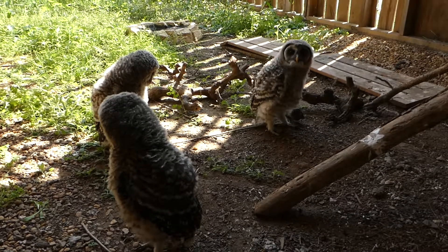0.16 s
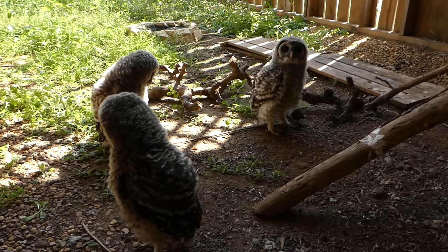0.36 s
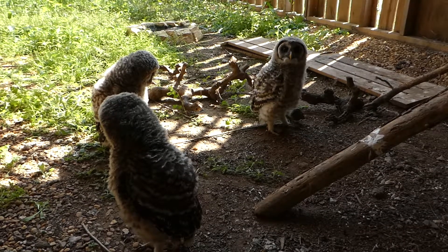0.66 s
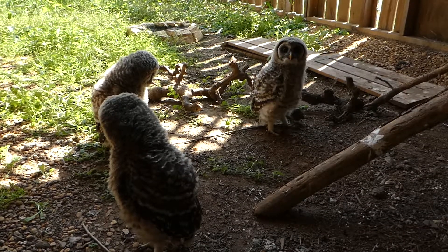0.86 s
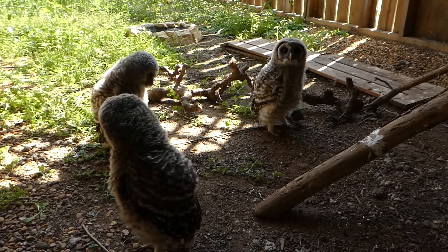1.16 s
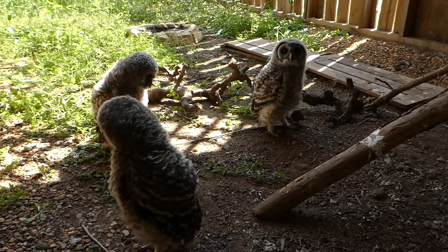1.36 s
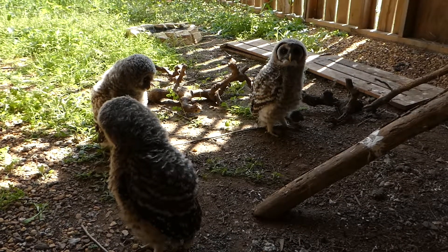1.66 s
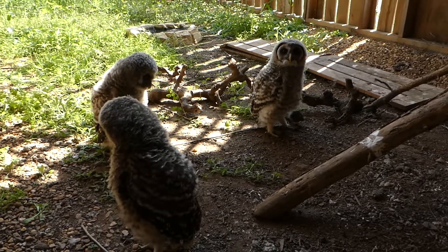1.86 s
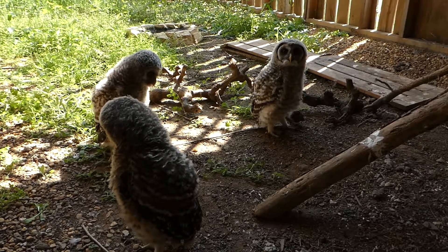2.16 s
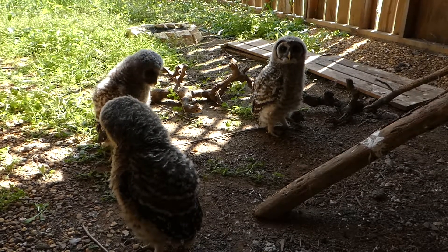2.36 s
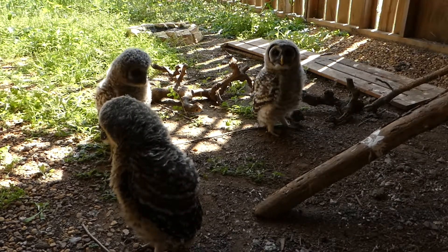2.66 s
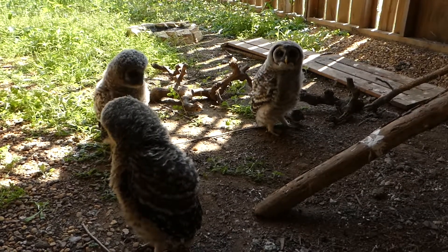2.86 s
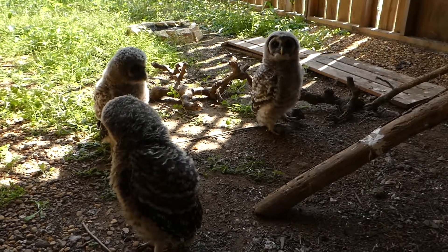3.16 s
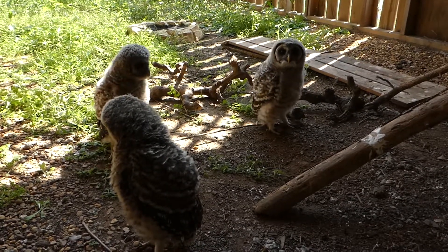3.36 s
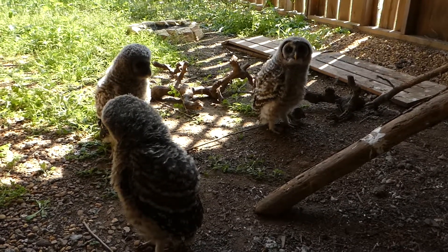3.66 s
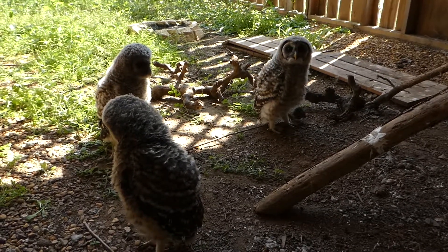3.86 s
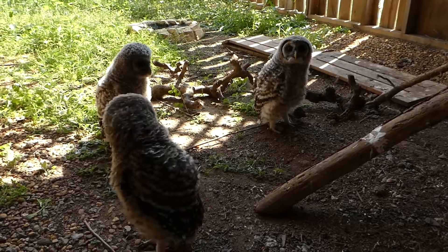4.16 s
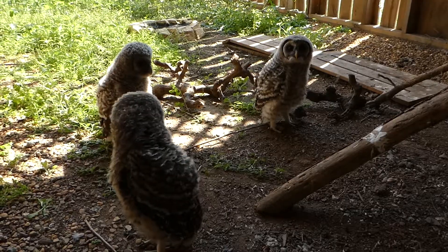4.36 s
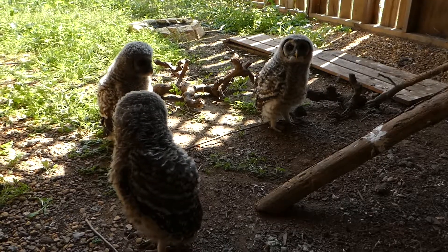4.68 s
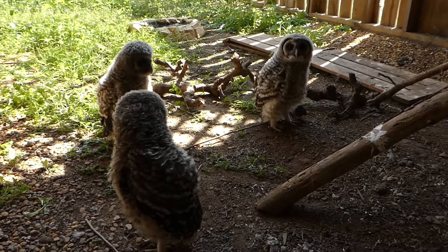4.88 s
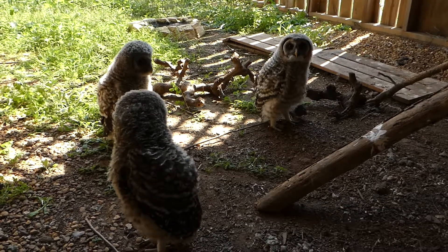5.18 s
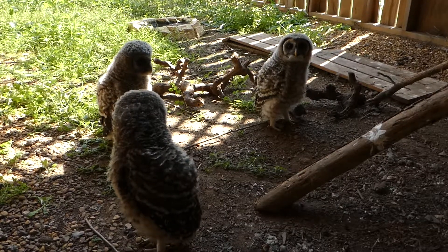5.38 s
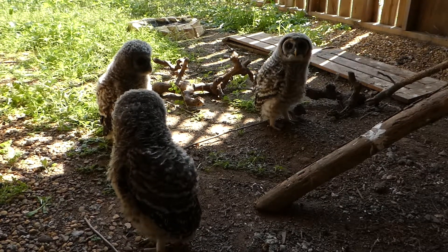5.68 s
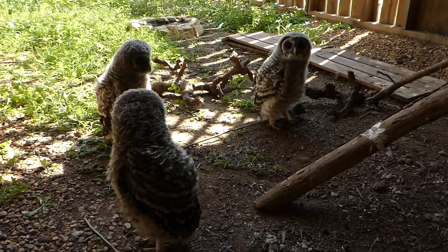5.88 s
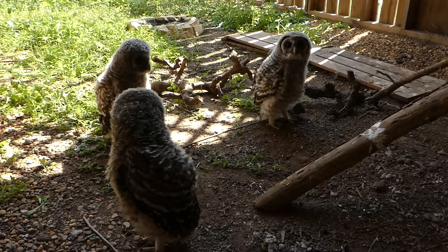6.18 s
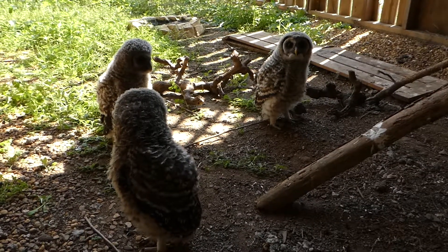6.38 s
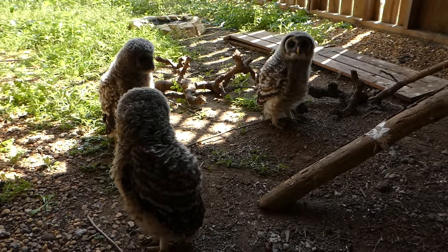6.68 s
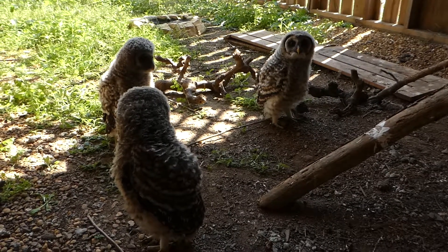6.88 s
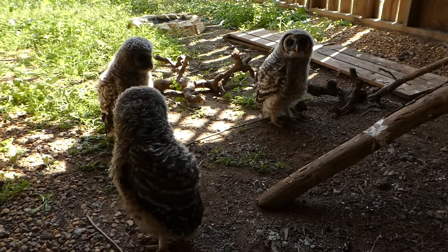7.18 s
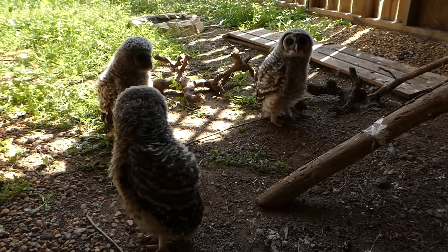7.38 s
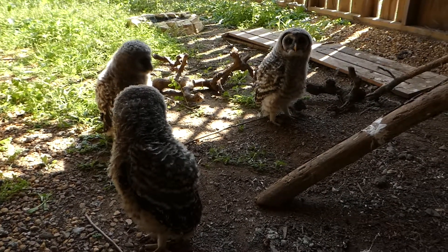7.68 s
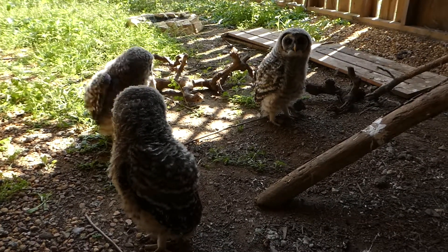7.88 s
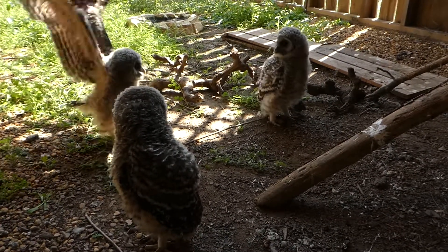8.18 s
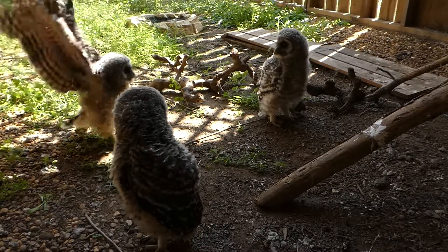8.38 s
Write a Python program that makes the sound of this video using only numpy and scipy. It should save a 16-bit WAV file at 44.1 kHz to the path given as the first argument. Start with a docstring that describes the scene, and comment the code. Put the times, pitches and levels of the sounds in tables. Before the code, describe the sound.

Hissy owlet screeches with thin falling whistles come and go in a quiet outdoor enclosure, broken by dry clicks and one loud snap.

```python
"""Young owls beg in a plank-walled pen, over a quiet outdoor hiss that is wide in the bass.
Two overlapping screeches open the scene with a soft low hoot: breath noise in throat and mouth resonances,
the second with a whistle that leaps up, sags and falls. Feathers brush, far chirps follow, then bill snaps
and knocks, made of struck modes. Whistling screeches come near 4.8 s and 7.5 s, a hoot between them;
after the last come feathers, a loud snap and another hoot. Echoes and a diffuse tail make the pen."""
import sys
import numpy as np
from scipy import signal
from scipy.fft import rfft, irfft
from scipy.io import wavfile

SR = 44100
rng = np.random.default_rng(int(sys.argv[2]) if len(sys.argv) > 2 else 0)


def persist_wave(psi):
    """Save psi, clipped to +-1, as 16-bit WAV."""
    counts = np.round(np.clip(psi, -1, 1) * 32767).astype(np.int16)
    wavfile.write(sys.argv[1], SR, np.atleast_2d(counts).T)


def convert_level_to_amplitude(level_db):
    """Map a level in decibels to its linear amplitude factor."""
    exponent = np.asarray(level_db, float) / 20
    return 10 ** exponent


N = 376613   # samples

# Screeches. Each row: start in seconds, end in seconds, gape opening time in seconds, left minus right in dB.
SCREECHES = [(-.03, .79, .125, -3), (.375, 1.0, .06, -3), (4.82, 5.41, .065, -6), (7.545, 8.105, .065, 0)]
# Throat resonance per screech. Each row: start in Hz, end in Hz, nominal width in Hz.
THROAT = [(951.5, 870, 98), (893, 830, 330), (592, 780, 380), (1034, 1000, 164)]
# Breath per screech. Each row: throat, palate, gape, bill, each a pair of base levels at start and end in dB.
BREATH = [
    [(-42, -49.5), (-50, -54), (-41, -42.5), (-52.5, -54)],
    [(-60, -55), (-56, -55), (-73, -69), (-59.5, -59)],
    [(-58, -56), (-53, -56.5), (-52, -63.5), (-66, -58.5)],
    [(-46, -54), (-45.5, -52), (-41.5, -41.5), (-56.5, -48.5)],
]
# Mouth resonances for three mouth shapes: palate, three of the gape, bill.
# Each row: centre in Hz, nominal width in Hz, level relative to the breath in dB.
MOUTH = [
    [(1985, 1350, -4), (3710, 1050, -8), (4564, 2900, -5.5), (6100, 2300, -11), (9860, 13000, -2)],
    [(1982, 1600, -5), (3660, 560, -9.5), (4460, 1800, -5.5), (5560, 2030, 0), (8900, 9100, -1.5)],
    [(2126, 2200, -6.5), (3536, 2200, -10.5), (4336, 1800, -8.5), (5660, 1700, -14), (8920, 5700, -5)],
]
# Mouth shape index per screech.
MOUTH_SHAPE = [0, 0, 1, 2]
# Onset times in seconds: throat, palate, bill.
ONSET_S = (0.037, 0.071, 0.019)
# Level offsets at the onset in dB: throat, palate, gape, bill.
ONSET_FROM_DB = (-16, -16, -28, -16)
RELEASE_DB_PER_S = 608
PUFF_DB, PUFF_S = 13.5, 0.055   # the bill hisses harder as it opens
EFFORT_WAVER_DB, EFFORT_WAVER_HZ = -2.5, 25.5
THROAT_WAVER_DB, THROAT_WAVER_HZ = 4, 30.5
PATCHY_DB, PATCHY_HZ = 1.3, 30   # each mouth resonance flickers on its own
CORE_SHARE, CORE_DB = 0.14, -4.5   # narrow core of a mouth resonance: share of its width, level

# Whistles of the last three screeches. Each row: time in seconds, pitch in Hz, level before the common lift in dB.
WHISTLES = [
    [(.37, 5560, -64), (.382, 5950, -40), (.42, 7800, -50.5), (.62, 7420, -50.5), (.68, 7380, -47),
     (.9, 7120, -42.5), (.94, 6690, -43), (.97, 6230, -54), (.993, 5150, -45), (1.035, 4940, -70)],
    [(4.812, 4830, -82), (4.828, 5430, -47.5), (4.86, 7700, -50.5), (4.94, 6840, -50), (5.225, 6700, -48.5),
     (5.24, 6700, -44), (5.31, 6535, -52), (5.36, 6370, -59), (5.37, 6100, -61), (5.386, 5610, -43),
     (5.404, 5110, -41), (5.412, 4950, -56), (5.428, 4600, -70)],
    [(7.537, 5010, -136), (7.547, 5440, -44), (7.575, 7580, -42), (7.61, 7730, -58), (7.635, 7310, -44.5),
     (7.81, 7200, -43.5), (7.84, 7050, -39.5), (7.89, 6870, -44), (7.925, 6460, -45.5), (7.98, 6400, -43),
     (8.02, 6170, -43.5), (8.05, 6050, -46), (8.085, 5620, -43.5), (8.12, 5350, -55)],
]
# Left minus right in dB per whistle.
WHISTLE_PAN_DB = [-3, -5.5, -0.5]
OCTAVE_AT_6KHZ_DB, OCTAVE_DB_PER_KHZ, OCTAVE_WIDTH_HZ = -18, -8.5, 270

# Noise bands, narrow to wide, that slide or hold: breath resonances, the tail of an earlier call,
# the falling octave of the last whistle. Rows with end before start are silent.
# Each row: start in seconds, end in seconds, from Hz, to Hz, peak level in dB, nominal width in Hz.
NOISE_BANDS = [(-0.2, 0.21, 7510, 8200, -46, 1700), (0.949, 1.084, 4270, 3530, -63, 320),
               (4.5, 4.87, 3400, 5100, -61, 280), (4.862, 5.131, 5700, 5320, -51, 430),
               (5.07, 5.361, 5900, 5950, -56, 301), (0.4, 0.799, 5100, 4950, -48.5, 380),
               (5.5, 5.452, 4250, 3600, -54.5, 180), (6, 5.45, 6200, 5000, -50, 230),
               (7.801, 8.117, 4193, 4713, -50, 260.2), (8, 8.185, 4174, 3920, -45, 230),
               (8, 8.16, 11700, 10300, -46.5, 530), (7.5, 8.005, 2140, 2030, -51.5, 220),
               (8.5, 8.19, 7500, 5820, -57, 220)]

# Bill snaps and knocks. Each row: time in seconds, level in dB, send to the walls in dB, left minus right in dB.
SNAPS = [(2.7622, -32, -16, -2.5), (2.7642, -20, -19.5, -2.5), (2.7797, -25, -34, -7),
         (3.5203, -32, -15.5, -2), (4.284, -51, -13, -3), (4.3, -38, -23, -10), (4.307, -38.5, -13.5, -15),
         (6.885, -45.5, -13.5, -1.1), (8.3465, -36, -17, 6), (8.3594, -3, -18.5, 3)]
# Index of the struck thing per snap.
STRUCK_BY = [0, 0, 0, 1, 2, 2, 3, 4, 5, 5]
# Modes of each struck thing. Each row: frequency in Hz, relative level in dB, T60 in ms.
STRUCK_MODES = [
    [(560, -15, 11), (810, 0, 15.4), (1080, -7, 8.1), (1270, -15, 8.5), (1750, -8, 7.2), (3000, -6, 4.8),
     (4300, -4, 2.3), (9400, -8, 1.7)],
    [(1780, -2, 3.5), (2500, -1, 4.5), (3500, 1, 5), (4370, 1, 3.5), (5400, 0.5, 12), (6100, 2.5, 12),
     (6950, 0, 6.9), (8000, -3, 3), (9800, 0.5, 4), (13300, -8, 4)],
    [(1360, -10, 20), (1610, 1, 32), (2300, -12, 2), (3050, -3, 14), (7700, -20, 1)],
    [(426, -3.5, 21), (666, -1, 28), (980, 1, 6.2), (2300, -7, 2), (7700, -15, 1)],
    [(306, -0.5, 20), (570, 1.5, 10), (2300, -26, 2)],
    [(475, -19.5, 11), (743, -10, 9.4), (1420, -1, 6.1), (2300, -3, 4.6), (2990, -4, 3.6),
     (4350, -6.5, 2.6), (6300, -8.5, 1.4), (8700, -4, 2.4), (12400, -5.5, 1.3)],
]
# Touch of each struck thing.
# Each row: contact in seconds, push of air relative to the snap in dB, lowpass towards the walls in Hz.
TOUCH = [(0.00025, -44, 5400), (.003, -43, 9000), (0.0002, -30, 4800), (0.00073, -18, 4000),
         (0.00074, -28, 4000), (0.000097, -33, 5300)]
TICKS = 5   # a contact crackles: ticks spread over its length

# Feathers brushing. Each row: start in seconds, full in seconds, end in seconds, full level in dB, end level in dB.
WINGS = [(1.268, 1.28, 1.37, -63, -69), (8.14, 8.21, 8.33, -64, -64)]
# Low hoots. Each row: start in seconds, end in seconds, pitch in Hz, mean level in dB.
HOOTS = [(-.2, 1.4, 270, -66), (6.66, 7.12, 266, -69), (8.36, 8.8, 278, -64)]
HOOT_SWELL_S, HOOT_WAVER_HZ, HOOT_WAVER_DB = 0.15, 6, 1.3
# Far chirps and grunts. Each row: start in seconds, length in seconds, pitch in Hz, peak level in dB.
CHIRPS = [(1.3, 0.09, 3550, -68), (1.44, 0.14, 2990, -70), (1.93, .06, 459, -74), (3.2, .1, 2510, -68),
          (3.3, 0.04, 268, -66), (5.135, 0.05, 235, -67), (5.164, 0.016, 2980, -50), (5.76, .65, 2510, -74)]

# Echoes off ground and near walls. Each row: delay in seconds, level before dulling in dB.
ECHOES = [(.0038, 3.5), (.0095, 12), (0.0161, 3.5)]
# Pen decay. Each row: frequency in Hz, T60 in seconds.
PEN_T60 = [(300, 0.31), (1500, 0.26), (5000, 0.25), (12000, 0.13)]
# Side against mid in the wall sound. Each row: frequency in Hz, ratio in dB.
PEN_SIDE = [(300, -10), (1000, -4), (4000, -10.5), (12000, 3.5)]
PEN_LUMPS_DB, PEN_LUMPS_HZ = 2, 353   # reflections off planks and posts arrive in clumps

# Mid hiss spectrum. Each row: frequency in Hz, relative density in dB.
HISS_MID = [(15, -45), (25, -39), (48, -16), (275, 0), (539, -3.5), (616, -1), (686, -5.5), (1210, -7.5),
            (2020, -8.5), (2500, -8), (3850, -13), (5610, -9.5), (7960, -15), (9610, -10), (15600, -27.5)]
# Side hiss spectrum. Each row: frequency in Hz, relative density in dB.
HISS_SIDE = [(15, -48), (25, -32), (44, -16), (129, -2), (227, 4), (323, 3.5), (446, 3.5), (1540, -8.5),
             (2570, -14.5), (4170, -19.5), (7960, -24.5), (9870, -20), (15600, -33.5)]
HISS_MID_DB, HISS_SIDE_DB = -64.5, -59
# Humps and thin lines in the hiss. Each row: centre in Hz, nominal width in Hz, mean level in dB, waver in dB.
HUMPS = [(5500, 700, -72, .3), (9700, 1100, -71, .3), (9440, 70, -76, .6), (5760, 50, -82, .8),
         (620, 60, -84, 1.5), (2570, 160, -79, 3)]
# Far rumble. Each row: time in seconds, level before the channel gains in dB.
RUMBLE = [(0.0, -89), (0.62, -68), (1.6, -84), (3.4, -108), (5.29, -75.5), (6.2, -103), (7.5, -89),
          (8.0, -76)]


def rms_one(x):
    """Scales a signal to rms 1."""
    return x / np.sqrt(np.mean(np.abs(x) ** 2) + 1e-20)


def in_time(rows):
    """Start sample, end sample, 4 ms fades (none at the scene's edges) and columns interpolated in time."""
    s, *columns = np.transpose(rows)
    a, b = int(s[0] * SR), min(int(s[-1] * SR), N)
    t = np.arange(a, b) / SR
    since_start = t - s[0] + (a == 0)
    until_end = s[-1] - t + (b >= N - 9)
    fade = np.clip(np.minimum(since_start, until_end) / 0.004, 0, 1)
    return a, b, fade, [np.interp(t, s, c) for c in columns]


def at_hz(points, hz):
    """Interpolates a table over log frequency."""
    table_hz, value = np.transpose(points)
    return np.interp(np.log(hz), np.log(table_hz), value)


def flutter(width_hz, size, order=2):
    """Complex lowpass noise, rms 1: wandering amplitude and phase of a resonance fed by air."""
    r = np.exp(-np.pi * width_hz / SR)
    settle = 8000
    z = rng.standard_normal(size + settle) + 1j * rng.standard_normal(size + settle)
    for _ in range(order):
        z = signal.lfilter([1 - r], [1, -r], z)
    return rms_one(z[settle:])


def turning(hz):
    """Unit phasor at a moving frequency."""
    return np.exp(2j * np.pi * np.cumsum(hz) / SR)


def air_band(hz, width_hz, size, order=1):
    """Noise in a resonance whose centre may move; rms near 1."""
    carrier = turning(hz + np.zeros(size))
    return np.sqrt(2) * (flutter(width_hz, size, order=order) * carrier).real


def panned(x, pan_db):
    """Splits a left-minus-right level difference between the channels."""
    return x * convert_level_to_amplitude([[pan_db / 2], [-pan_db / 2]])


def mouth_resonance(hz, width_hz, db, size):
    """Breath noise in a broad resonance with a narrow core, under a common flicker."""
    flicker = convert_level_to_amplitude(db + PATCHY_DB * flutter(PATCHY_HZ, size).real)
    broad = air_band(hz, width_hz, size, order=3)
    core = air_band(hz, CORE_SHARE * width_hz, size, order=2)
    return flicker * (broad + convert_level_to_amplitude(CORE_DB) * core)


def screeches():
    """Turbulent breath through throat, palate, gape and bill resonances, with uneven airflow."""
    out = np.zeros((2, N))
    bandpass = signal.butter(3, [520, 12000], "band", fs=SR, output="sos")
    for screech, throat_row, levels, shape in zip(SCREECHES, THROAT, BREATH, MOUTH_SHAPE):
        start, end, gape_s, pan_db = screech
        throat_from_hz, throat_to_hz, throat_width_hz = throat_row
        a, b, fade, (t,) = in_time([(max(start, 0),) * 2, (end + 0.1,) * 2])
        size = b - a
        share = np.clip((t - start) / (end - start), 0, 1)
        effort_db = EFFORT_WAVER_DB * flutter(EFFORT_WAVER_HZ, size).real
        effort_db = effort_db - RELEASE_DB_PER_S * np.maximum(t - end, 0)

        throat_onset_s, palate_onset_s, bill_onset_s = ONSET_S
        onsets_s = (throat_onset_s, palate_onset_s, gape_s, bill_onset_s)
        breath_db = []
        for (first, last), onset_s, from_db in zip(levels, onsets_s, ONSET_FROM_DB):
            onset_db = from_db * np.clip(1 - (t - start) / onset_s, 0, 1)
            breath_db.append(first + (last - first) * share + effort_db + onset_db)
        throat_db, palate_db, gape_db, bill_db = breath_db
        bill_db = bill_db + PUFF_DB * np.exp(-(t - start) / PUFF_S)

        throat_hz = throat_from_hz + (throat_to_hz - throat_from_hz) * share
        throat_waver = convert_level_to_amplitude(THROAT_WAVER_DB * flutter(THROAT_WAVER_HZ, size).real)
        throat = throat_waver * air_band(throat_hz, throat_width_hz, size, order=2)
        throat += 0.41 * air_band(1.25 * throat_hz, 2250, size, order=2)
        palate, *gape, bill = [mouth_resonance(*row, size) for row in MOUTH[shape]]

        voice = convert_level_to_amplitude(throat_db - 3.5) * throat + convert_level_to_amplitude(palate_db) * palate
        voice += convert_level_to_amplitude(gape_db) * sum(gape) + convert_level_to_amplitude(bill_db) * bill
        rasp = convert_level_to_amplitude(2.1 * flutter(100, size).real)   # uneven airflow
        voice = signal.sosfilt(bandpass, voice * rasp)
        out[:, a:b] += panned(voice * fade, pan_db)
    return out


def whistles():
    """Half-steady jet tones; the octave grows as the pitch falls."""
    out = np.zeros((2, N))
    for whistle, pan_db in zip(WHISTLES, WHISTLE_PAN_DB):
        a, b, fade, (hz, db) = in_time(whistle)
        size = b - a
        jet = rms_one(0.7 + flutter(220, size)) * turning(hz)
        octave_db = OCTAVE_AT_6KHZ_DB + OCTAVE_DB_PER_KHZ * (hz - 6000) / 1000
        octave = (jet ** 2 * flutter(OCTAVE_WIDTH_HZ, size)).real
        breath = air_band(0.93 * hz, 3000, size, order=2)   # hugs the whistle from below
        tone = jet.real + convert_level_to_amplitude(octave_db) * octave + convert_level_to_amplitude(-14) * breath
        out[:, a:b] += panned(convert_level_to_amplitude(db + 4.5) * tone * fade, pan_db)
    return out


def noise_bands():
    """Noise bands that slide or hold, for breath, an earlier call's tail and a falling octave; sine-squared swells."""
    out = np.zeros(N)
    for start, end, from_hz, to_hz, db, width_hz in NOISE_BANDS:
        if end <= start:
            continue
        a = int(max(start, 0) * SR)
        share = (np.arange(a, int(end * SR)) / SR - start) / (end - start)
        size = len(share)
        band = air_band(from_hz + (to_hz - from_hz) * share, width_hz, size, order=2)
        out[a:a + size] += convert_level_to_amplitude(db) * np.sin(np.pi * share) ** 2 * band
    return panned(out, -1.7)


def ring(hz, t60_ms, t):
    """A sine mode that dies by 60 dB in t60_ms."""
    return np.sin(2 * np.pi * hz * t) * convert_level_to_amplitude(-60000 * t / t60_ms)


def snaps():
    """Each tick of a contact sets modes ringing; returns the direct sound and the send to the walls."""
    size = 3000
    direct, sent, t = np.zeros((2, N)), np.zeros(N), np.arange(size) / SR
    chance = rng.random((len(SNAPS), TICKS))
    for (s, db, walls_db, pan_db), which, when in zip(SNAPS, STRUCK_BY, chance):
        contact_s, push_db, dull_hz = TOUCH[which]
        modes = STRUCK_MODES[which]
        tick_s = contact_s * (np.arange(TICKS) + when) / TICKS
        since_tick = np.maximum(t - tick_s[:, None], 0)
        hit = np.zeros(size)
        for k, (hz, mode_db, t60_ms) in enumerate(modes):
            hit += (-1) ** k * convert_level_to_amplitude(mode_db) * ring(hz, t60_ms, since_tick).mean(0)
        highpass_hz = min(0.54 * modes[0][0], 1300)
        highpass = signal.butter(2, highpass_hz, "high", fs=SR, output="sos")
        hit = convert_level_to_amplitude(db) * signal.sosfilt(highpass, hit)
        hit += convert_level_to_amplitude(db + push_db) * ring(260, 20, t)   # push of air
        a = int(s * SR)
        direct[:, a:a + size] += panned(hit, pan_db)
        dulled = signal.lfilter(*signal.butter(1, dull_hz, fs=SR), hit)
        sent[a:a + size] += convert_level_to_amplitude(walls_db) * dulled
    return direct, sent


def wings():
    """Soft, grainy feather noise, band-limited and swelling."""
    out = np.zeros(N)
    bandpass = signal.butter(2, [600, 4500], "band", fs=SR, output="sos")
    for start, full, end, full_db, end_db in WINGS:
        a, b, fade, (db,) = in_time([(start, full_db - 38), (full, full_db), (end, end_db)])
        grain = convert_level_to_amplitude(0.51 * flutter(93, b - a).real) * rng.standard_normal(b - a)
        out[a:b] = convert_level_to_amplitude(db) * fade * rms_one(signal.sosfilt(bandpass, grain))
    return out


def hoot_and_chirps():
    """Soft far notes: wavering near-sines for hoots, short narrow noise bands for chirps and grunts."""
    out, t = np.zeros(N), np.arange(N) / SR
    for start, end, hz, db in HOOTS:
        swell = np.clip(np.minimum(t - start, end - t) / HOOT_SWELL_S, 0, 1)
        level = np.sqrt(2) * convert_level_to_amplitude(db + HOOT_WAVER_DB * flutter(5, N).real)
        pitch_hz = hz + HOOT_WAVER_HZ * flutter(4, N).real
        note = (rms_one(3 + flutter(20, N)) * turning(pitch_hz)).real
        out += level * swell * note
    for s, length_s, hz, db in CHIRPS:
        a, size = int(s * SR), int(length_s * SR)
        swell = np.sqrt(np.hanning(size))
        out[a:a + size] += convert_level_to_amplitude(db) * swell * air_band(hz, 90, size, order=2)
    return out


def pen(x):
    """A few distinct echoes, then a diffuse tail that dies band by band."""
    t = np.arange(SR // 2) / SR
    early, tail = np.zeros(len(t)), 0
    for s, db in ECHOES:
        early[int(s * SR)] = convert_level_to_amplitude(db)
    early = signal.lfilter([0.6], [1, -0.4], early)   # wood and earth dull the echoes
    build_up = np.clip((t - 0.0075) / 0.0023, 0.12, 1)
    for low_hz in 90 * 2.0 ** np.arange(0, 7.5, 0.5):   # half-octave bands
        band = signal.butter(1, [low_hz, low_hz * np.sqrt(2)], "band", fs=SR, output="sos")
        mid, side = signal.sosfilt(band, rng.standard_normal((2, len(t))))
        decay = convert_level_to_amplitude(-60 * t / at_hz(PEN_T60, low_hz)) * build_up
        side = convert_level_to_amplitude(at_hz(PEN_SIDE, low_hz)) * side
        tail = tail + decay * (mid + side * [[1], [-1]])
    tail = tail * convert_level_to_amplitude(PEN_LUMPS_DB * flutter(PEN_LUMPS_HZ, len(t)).real)
    return signal.fftconvolve(x[None], early + convert_level_to_amplitude(-10.5) * tail, axes=1)[:, :N]


def coloured(spectrum):
    """Noise shaped to a spectrum; rms 1."""
    hz = np.maximum(np.fft.rfftfreq(N, 1 / SR), 10)
    return rms_one(irfft(rfft(rng.standard_normal(N)) * convert_level_to_amplitude(at_hz(spectrum, hz)), N))


def outdoor_hiss():
    """Mid and side hiss with far rumble; the side rules the bass, so the channels there run opposite."""
    mid = convert_level_to_amplitude(HISS_MID_DB) * coloured(HISS_MID)
    for hz, width_hz, db, waver_db in HUMPS:
        level = convert_level_to_amplitude(db + waver_db * flutter(1.2, N).real)
        mid += level * air_band(hz, width_hz, N, order=2)
    side = convert_level_to_amplitude(HISS_SIDE_DB) * coloured(HISS_SIDE)
    rumble_db = np.interp(np.arange(N) / SR, *np.transpose(RUMBLE))
    rumble = convert_level_to_amplitude(rumble_db) * air_band(120, 140, N, order=2)
    return panned(mid + side * [[1], [-1]] + rumble * [[1.6], [-0.7]], -0.68)


def scene():
    """Sums the direct sources, their wall sound and the hiss."""
    calls, feathers = screeches(), wings()
    thin = whistles() + noise_bands()
    direct, sent = snaps()
    sent = sent + convert_level_to_amplitude(-19.5) * calls.mean(0) + convert_level_to_amplitude(-23.5) * thin.mean(0) + convert_level_to_amplitude(-17.5) * feathers
    far = panned(hoot_and_chirps() + feathers, -13)
    return calls + thin + direct + far + pen(sent) + outdoor_hiss()


def top_cut(x):
    """Nothing passes above the cut-off."""
    return signal.sosfilt(signal.butter(12, 16570, fs=SR, output="sos"), x)


def record(dry):
    """Takes the finished mix to its final form."""
    return top_cut(dry)


dry = scene()
out = record(dry)
persist_wave(out)
```